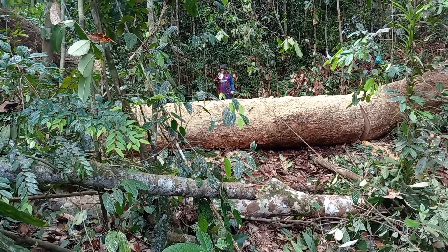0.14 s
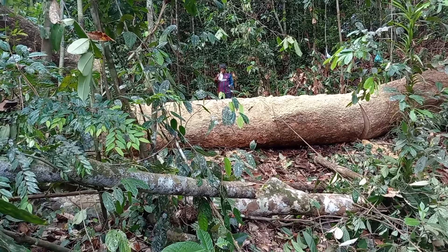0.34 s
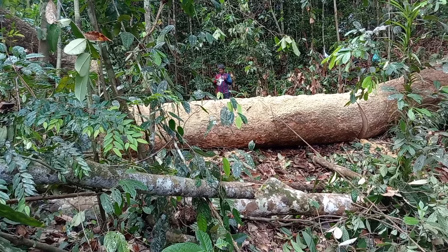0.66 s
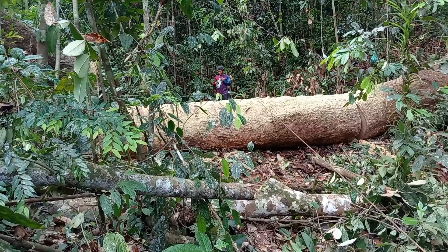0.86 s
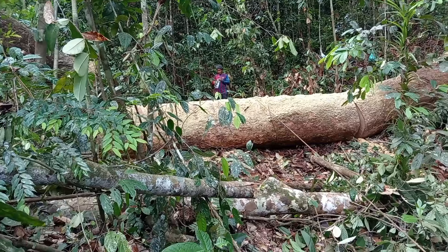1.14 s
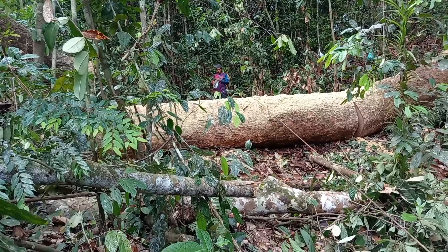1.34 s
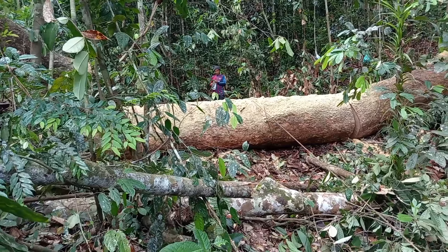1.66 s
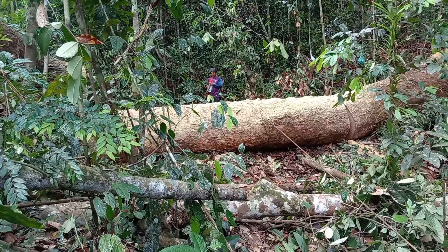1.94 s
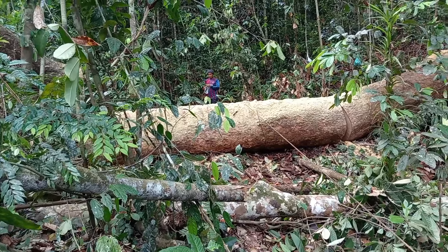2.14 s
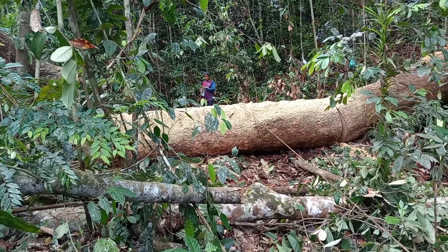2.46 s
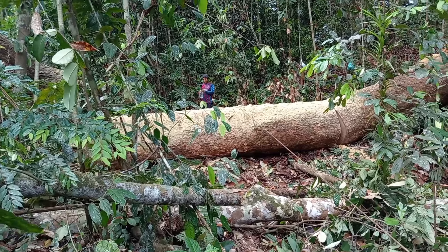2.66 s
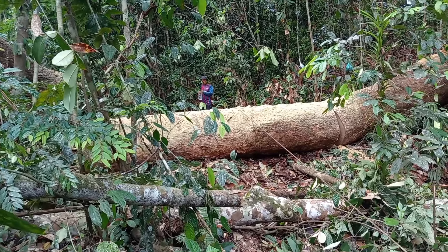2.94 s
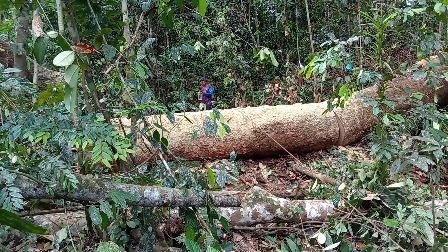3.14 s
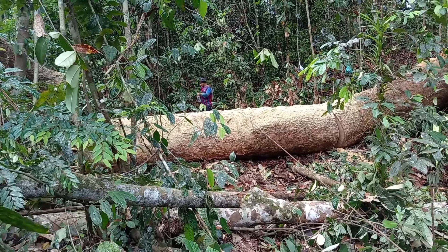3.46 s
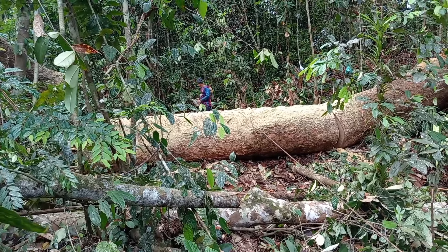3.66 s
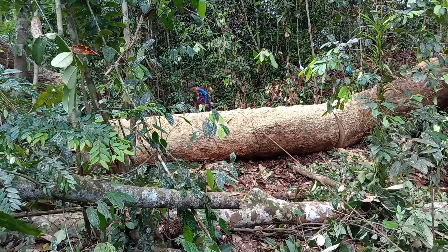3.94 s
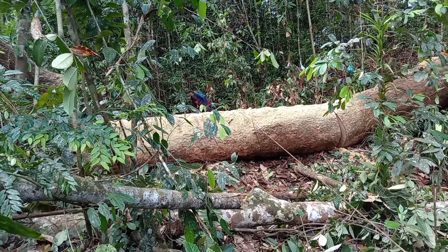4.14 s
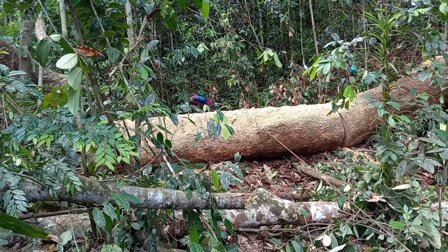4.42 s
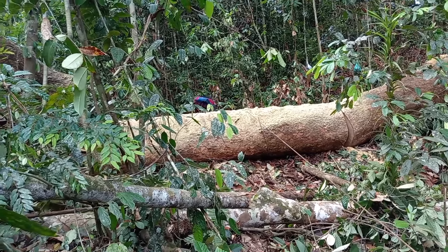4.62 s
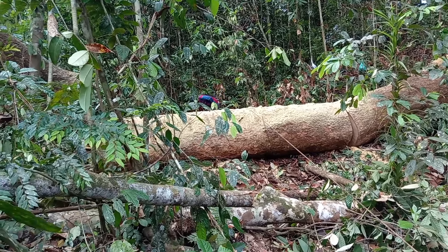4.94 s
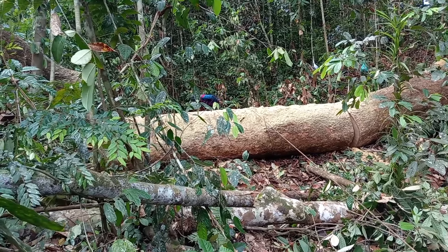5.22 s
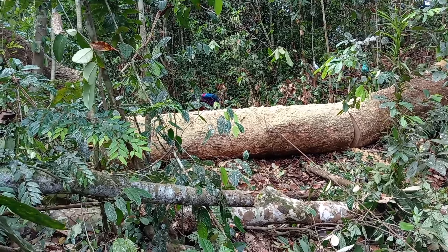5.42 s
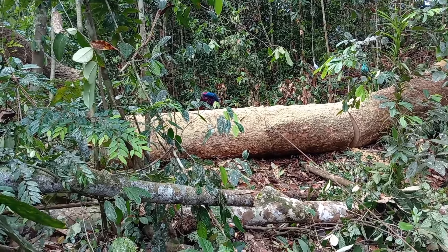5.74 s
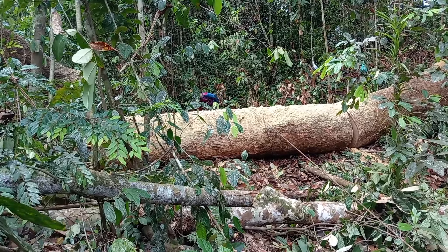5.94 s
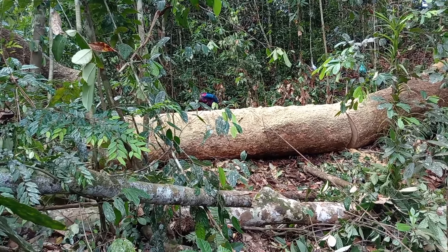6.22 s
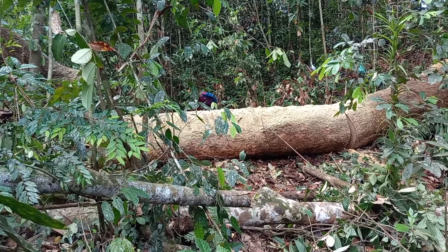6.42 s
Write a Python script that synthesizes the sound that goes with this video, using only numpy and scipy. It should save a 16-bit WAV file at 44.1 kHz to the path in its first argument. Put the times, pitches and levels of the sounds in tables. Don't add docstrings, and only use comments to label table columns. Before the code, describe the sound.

A hand winch ratchets in the forest, its hard metallic clicks echoing off trunks, with dull thuds and two hollow pole knocks midway.

```python
import sys
import numpy as np
from scipy import signal
from scipy.fft import rfft, irfft, next_fast_len
from scipy.io import wavfile
from scipy.ndimage import uniform_filter1d

SR = 44100
rng = np.random.default_rng(int(sys.argv[2]) if len(sys.argv) > 2 else 0)


def ratio(d):
    e = np.asarray(d, float) / 20
    return 10 ** e


def digitize_waveform(pressure):
    field = np.atleast_2d(pressure).T
    bounded = np.clip(field, -1, 1)
    quanta = np.round(bounded * 32767).astype(np.int16)
    wavfile.write(sys.argv[1], SR, quanta)


N = 290351

# f/Hz, level/dB, time to fade by 60 dB/s
POLE_TONES = [(197, -7, .1), (388, -10, .08), (505, -22, .08), (625, -1, .2), (660, -3, .16),
              (733, -3, .18), (960, -18, .05), (1190, -13, .04)]
# f/Hz, level/dB
CRACK_NOISE = [(2800, -2), (4200, -3), (6000, -1.5), (7500, -16.5), (9000, -11)]


def pawls():
    rows, parts = contacts()
    s, db, bright_db, centre, t60, tooth = np.transpose(rows)[:, :, None]
    lead = .008
    t = np.arange(SR // 9) / SR
    after = np.maximum(t - lead, 0)
    shape = len(s), len(t)
    rise = landing(db, bright_db, t - lead)

    def fall(share):
        return ratio(-60 * after / np.clip(share * t60, .004, 1))

    def colour(hz):
        return np.vstack([np.tile(np.interp(hz, f, gain), (count, 1)) for f, gain, count in parts])

    def on_time(x):
        return placed(x, s[:, 0] - lead - .0008)

    def dull(x):
        return filtered(x, lambda hz: 1 / (1 + (hz / 8300) ** 36 + (240 / (hz + 1)) ** 4))

    body, edge, jolt, glint, top = steel_parts(t, after, fall, shape, centre, tooth)
    attack = rise * (after < .01) * (after > 0)
    load_db = np.clip(-30.0 - 0.73 * bright_db, -40, -17)
    top_db = np.clip(8.16 * bright_db - 47.5, -47, -20)
    blow = even(body, attack) + ratio(bright_db) * even(edge, attack) + ratio(load_db) * jolt
    steel = dull(on_time(filtered(rise * blow, colour)))
    glints = dull(on_time(filtered(rise * ratio(bright_db - 18) * glint, colour)))
    spring = on_time(rise * ratio(top_db) * top)
    hum = placed(pole_hum(t, shape, db, bright_db), s[:, 0])
    return steel + spring, glints + np.roll(spring, 130), hum


def landing(db, bright_db, since):
    shape = len(db), len(since)
    after = np.maximum(since, 0)
    chatter_db = 4.37 * lumps(shape, 484)
    chatter_db = chatter_db - chatter_db[:, SR // 125:SR // 70].mean(1, keepdims=True)
    soft = np.clip(3.45 - 0.09 * bright_db - .04 * (db + 20), .6, 3)
    seated = 1 - np.exp(-after / 0.00072 / soft)
    slide = ratio(-24) * np.exp(np.minimum(since, 0) / 0.0011)
    again = .005 * (0.93 + .6 * rng.random(db.shape))
    bounce = 1 + ratio(-4) * (after > again) * np.exp(-np.abs(after - again) / 0.001)
    return ratio(db + 2.5) * (seated + slide) * bounce * ratio(chatter_db)


def steel_parts(t, after, fall, shape, centre, tooth):
    # f/Hz, level/dB, time to fade by 60 dB/s
    wheel = [(1180, -6, .04), (1380, -3, .04), (1520, -2, .04), (1690, -1, .04), (1850, -1, .04),
             (2050, 0, .045), (2290, 0, .04), (2480, -1, .04), (2750, -2, .035), (3080, -3, .04)]
    teeth = [(3600, -4, .02), (3890, -2, .028), (4400, -4, .02), (4800, -2, .022), (5200, -4, .02),
             (5600, -4, .022), (6680, -7, .025), (7400, -9, .035)]
    coil = [(9200, -1, .08), (10400, -5, .07), (12050, -4, .05), (13340, -8, .05), (14400, -3, .045),
            (15000, -5, .05), (15700, -4, .04)]
    # f/Hz, level/dB
    spring_noise = [(8500, 5.5), (10000, -3), (11000, -18), (12000, -12), (13300, -19), (15200, -10),
                    (16100, -19), (16700, -45.5)]
    cable_noise = [(220, 8.5), (390, 9), (650, -15), (1100, 3.5)]
    count = shape[0]

    def near_centre(hz):
        return (hz > 900) / (1 + (np.log2((hz + 1) / centre) / .45) ** 2)

    grit = unit(filtered(rng.standard_normal(shape), near_centre))
    body = ratio(1.5) * fall(1.0) * ring(wheel, t, count, 6, centre)
    body = body + (ratio(-5.0) * fall(0.42) + ratio(-14.5) * fall(1.84)) * grit
    edge = ratio(13.5) * fall(0.64) * ring(teeth, t, count, 6, tooth=tooth)
    edge = edge + ratio(-2.5) * fall(0.39) * noise(shape, CRACK_NOISE)
    jolt = fall(1.81) * (1 - np.exp(-after / 0.011)) * noise(shape, cable_noise)
    glint = fall(1.0) * noise(shape, CRACK_NOISE)
    top = fall(0.4) * noise(shape, spring_noise) + ratio(-18.5) * ring(coil, t, count, 10)
    return body, edge, jolt, glint, top


def pole_hum(t, shape, db, bright_db):
    swell = ratio(db - 22 - 0.41 * bright_db) * (1 - np.exp(-t / 0.28))
    return swell * ratio(5.8 * lumps(shape, 60)) * ring(POLE_TONES[3:6], t, shape[0], 2.7)


def contacts():
    # t/s, peak/dB, centre/Hz, time to fade by 60 dB/s
    take_up = [(0.3442, -17.5, 2010, 0.036), (1.0336, -8.5, 1910, 0.044), (1.6499, -14, 2060, 0.024),
               (2.331, -11.5, 2010, 0.035), (3.018, -12.5, 2250, 0.051), (3.6494, -17, 2180, 0.05),
               (4.158, -10.5, 1830, 0.03), (4.299, -13, 1920, 0.012), (4.9448, -13, 1930, 0.014),
               (5.6021, -22, 1750, 0.021), (6.239, -7, 2150, 0.012)]
    # t/s, peak/dB, centre/Hz, tooth/Hz, brightness/dB
    pull = [(0.4293, -10.5, 2400, 5470, 2), (0.4729, -12.5, 2230, 3780, 2.5),
            (0.5214, -13.5, 2260, 5120, 4.5), (0.611, -19, 2220, 6790, 2), (1.1, -14, 2200, 5400, 2),
            (1.142, -12, 2250, 3760, 1.5), (1.1914, -12.5, 2100, 4740, 3), (1.7421, -10, 2290, 4060, 1.5),
            (1.7887, -10, 2400, 4060, 2.5), (1.8359, -10.5, 2520, 3890, 1.5), (1.8952, -15, 2340, 5170, 2),
            (2.4164, -12, 2330, 3930, 2), (2.4674, -12.5, 2240, 3930, 2), (2.5481, -21, 2020, 4100, 5),
            (3.0864, -17.5, 2570, 4040, 1), (3.137, -10.5, 2520, 3750, 2), (3.2154, -25.5, 1760, 5150, 1.5),
            (3.7314, -11, 2380, 4060, 2.5), (3.7831, -13.5, 2600, 3800, 1.5), (3.8543, -17, 2240, 4840, 3),
            (4.388, -13.5, 2185, 5460, 2.5), (4.444, -15, 2090, 3730, 2), (4.5114, -17.5, 2520, 3930, 3.5),
            (5.0464, -13.5, 2450, 4470, 2), (5.1034, -15.5, 2580, 3930, 2), (5.1733, -18.5, 2100, 3900, 2),
            (5.68, -14.5, 2330, 3760, 1.5), (5.7329, -14, 2510, 3850, 1), (5.8159, -17, 2020, 6600, 2.5),
            (6.3154, -11.5, 2380, 6750, 2), (6.3662, -11, 2260, 3860, 2.5), (6.426, -14.5, 2180, 6650, 3.5)]
    # t/s, peak/dB, centre/Hz
    seat = [(0.0519, -18.5, 2160), (0.6939, -19.5, 1940), (1.3475, -18, 1700), (2.0403, -22.5, 1900),
            (2.6585, -19.5, 2040), (3.3295, -22.5, 2100), (3.995, -18.5, 2150), (4.66, -19, 1970),
            (5.2971, -19.5, 2100), (5.9279, -18.5, 2000)]
    # t/s, peak/dB
    ticks = [(0.326, -27), (0.939, -34), (0.9806, -29), (1.325, -45), (1.6262, -26), (2.0047, -37),
             (2.2935, -31), (2.6364, -37.5), (2.8833, -41.5), (2.938, -36.5), (3.2435, -27.5),
             (3.302, -31.5), (3.32, -32), (3.5932, -33), (3.955, -48), (4.2548, -27.5), (4.6241, -40),
             (4.8863, -32), (5.26, -34.5), (5.5473, -31.5), (5.583, -30), (5.8962, -42), (6.1756, -30),
             (6.508, -45.5), (6.568, -39)]
    # t/s, peak/dB, brightness/dB, centre/Hz
    rebounds = [(0.3588, -25, -26, 1750), (0.372, -18.5, 0.5, 2200), (0.7941, -20, -3, 1770),
                (1.052, -19, 1, 1670), (1.363, -14.5, -1.5, 2000), (1.6641, -19.5, -4, 1440),
                (1.6749, -18.5, 1, 2250), (1.693, -57, 28, 2220), (1.846, -30, -15, 1640),
                (2.0176, -25, -14, 1880), (2.026, -43, 10, 1650), (2.0577, -29.5, 1, 1890),
                (2.3466, -17.5, -19, 1760), (2.3533, -20, 1, 2030), (3.008, -18, -17, 1420),
                (3.0441, -25, -13, 1420), (3.6605, -15.5, -6, 1760), (3.671, -45, 24.5, 2080),
                (3.684, -28, -11, 1530), (4.1722, -21.5, 2.5, 2150), (4.31, -16, -6.5, 1410),
                (4.3212, -18.5, -1.5, 1910), (4.9562, -14.5, -10.5, 1720), (4.9772, -32, -6, 1400),
                (4.989, -27.5, -5, 1950), (5.3352, -27, -7, 1720), (5.3548, -27.5, 0, 1710),
                (5.6068, -19, 0.5, 1720), (5.6283, -30.5, -31, 1630), (6.254, -42.5, 23.5, 1440)]
    # t/s, peak/dB, centre/Hz
    slack = [(0.0228, -30.5, 1540), (0.412, -22, 1320), (0.5866, -30, 1440), (0.6658, -30.5, 1400),
             (0.675, -27.5, 1400), (1.0427, -17.5, 2030), (1.0686, -35.5, 1520), (1.094, -26.5, 1650),
             (1.095, -38, 1900), (1.241, -42.5, 1620), (1.3346, -29, 2230), (1.996, -44, 2300),
             (2.4052, -33, 1510), (2.605, -28.5, 2170), (2.624, -35, 1570), (3.052, -26.5, 2220),
             (3.2867, -44, 2300), (3.458, -30, 1800), (3.465, -18.5, 2050), (3.722, -24, 1480),
             (3.978, -33, 1460), (3.9922, -34, 1770), (4.3293, -24, 1680), (4.631, -39.5, 1900),
             (4.649, -42, 1700), (4.6409, -28.5, 1490), (4.8251, -35, 1700), (4.9972, -32.5, 1680),
             (5.005, -25.5, 1460), (5.028, -50, 1500), (5.039, -36, 1600), (5.282, -22, 1630),
             (5.565, -51, 1900), (5.577, -34, 2100), (5.596, -39, 2000), (5.909, -34, 1740),
             (5.92, -26.5, 1770), (6.161, -43, 1900), (6.2586, -19, 1430), (6.3034, -34, 1720)]
    # f/Hz, width/Hz,
    # level/dB
    hollows = [(2808, 240, -2), (4455, 91, -6.5), (5176, 100, 0.5), (7330, 160, -2.5)]
    lever = [(1020, 220, 4), (2150, 73, -6.5), (3060, 67, -2), (3880, 290, 5.5), (7300, 170, -15.5)]
    holder = [(1400, 206, 4), (2390, 600, -2.5), (3860, 260, 3), (6200, 410, 0), (7650, 480, -1),
              (8860, 1160, 7.5)]
    stop = [(2050, 105, 5.5), (2820, 120, 7), (3340, 170, 11), (4600, 110, 10), (5770, 220, 6.5),
            (7400, 92, -13)]
    driver = [(1400, 820, 2), (2500, 450, -2.5), (3670, 220, -7), (3720, 350, 7.5), (4620, 86, 6.5),
              (5710, 83, 7.5), (7600, 510, -2), (8210, 200, 6)]
    slow_ticks = [(s, db, -3, 1950, .026) for s, db in ticks]
    kinds = [(lever, [(s, db, -8.5, hz, t60) for s, db, hz, t60 in take_up]),
             (holder, [(s + .001, db - 4.0, bright_db, hz, .024, tooth_hz)
                       for s, db, hz, tooth_hz, bright_db in pull]),
             (stop, [(s, db, 1.5, hz, .025) for s, db, hz in seat]),
             (driver, slow_ticks + skips()),
             (lever, [(s, db, bright_db, hz, .03) for s, db, bright_db, hz in rebounds]),
             ([], [(s, db, -15.5, hz, .04) for s, db, hz in slack])]
    hz = np.arange(0, SR / 2, 20)

    def tint(part):
        return ratio(sum(db * np.exp(-((hz - c) / w) ** 2 / 2) for c, w, db in part + hollows))

    rows = [(*row, 100)[:6] for _, group in kinds for row in group]
    return rows, [(hz, tint(part), len(group)) for part, group in kinds]


def skips():
    # first tooth/s, last tooth/s, number of teeth, peak/dB, slowing/share
    swings = [(0.1104, 0.278, 5, -32, 0.027), (0.755, 0.902, 5, -32.5, -.09), (1.415, 1.577, 5, -32, 0.043),
              (2.0948, 2.213, 4, -31, 0.052), (2.7182, 2.836, 4, -30.5, -0.027),
              (3.3822, 3.5065, 4, -30.5, 0.049), (4.049, 4.123, 3, -30, 0.048),
              (4.705, 4.804, 4, -30, -0.0077), (5.347, 5.472, 4, -30, -0.041),
              (5.9774, 6.0825, 4, -30.5, 0.016)]
    rows = []
    for first, last, teeth, db, slowing in swings:
        u = np.linspace(-1, 1, round(teeth) - 1)
        way = np.cumsum(np.r_[0, 1 + slowing * u + 0.082 * u ** 2])
        rows += [(first + (last - first) * w / way[-1], db) for w in way]
    chance = 2 * rng.random((len(rows), 3)) - 1
    return [(s, db - a, 8.5 + 1.5 * b, 2233 * (1 + c / 8), .041)
            for (s, db), (a, b, c) in zip(rows, chance)]


def frame():
    # t/s, peak/dB
    thuds = [(0.063, -54), (0.367, -55), (0.435, -52.5), (0.603, -53), (0.691, -51.5), (0.798, -60),
             (1.047, -56), (1.364, -48.5), (1.666, -52), (2.041, -50), (2.342, -50), (2.662, -50.5),
             (3.024, -52), (3.325, -49.5), (3.658, -54), (3.995, -49), (4.376, -50), (4.657, -52),
             (4.821, -59.5), (4.956, -51.5), (5.297, -53), (5.632, -51), (5.928, -53), (6.254, -56.5)]
    # f/Hz, level/dB, time to fade by 60 dB/s
    frame_tones = [(115, -9.5, 0.1), (144, -7, 0.091), (176.7, -7.5, 0.07)]
    s, db = np.transpose(thuds)[:, :, None]
    t = np.arange(SR // 3) / SR
    shaking = ratio(3 * lumps((len(s), len(t)), 40))
    swell = (t / 0.0099) ** 2 / (1 + (t / 0.0066) ** 2) * ratio(db + 19.0) * shaking
    return placed(swell * ring(frame_tones, t, len(s), 1.6), s[:, 0] - .004)


def pole():
    # t/s, level/dB
    knocks = [
        (3.455, -59.5),
        (3.4729, -43.5),
        (4.1735, -33.5),
    ]
    s, db = np.transpose(knocks)[:, :, None]
    hz, level_db, t60 = np.transpose(POLE_TONES)[:, :, None]
    t = np.arange(SR // 3) / SR
    sign = np.where(hz > 700, -1, 1)
    tone = (sign * ratio(level_db - 60 * t / t60) * np.sin(2 * np.pi * hz * t)).sum(0)
    damping = ratio(-13 / (1 + np.exp((.024 - t) / 0.0018)))
    return placed(ratio(db + 13) * (1 - np.exp(-t / 0.0025)) * damping * tone, s[:, 0])


def trunks(x):
    # f/Hz, time/s
    echo_fade = [(150, 0.52), (650, 0.11), (2000, 0.078), (6000, 0.19), (9000, 0.12), (14000, 0.18)]
    hop = SR // 4
    out = np.zeros((2, N + 3 * SR))
    x = np.pad(x, (hop, 2 * hop))
    fade = np.sin(np.pi * np.arange(2 * hop) / (2 * hop))
    for start in range(0, N + hop, hop):
        hz, t, z = signal.stft(rng.standard_normal((2, SR // 3)), SR, nperseg=128)
        z = z * ratio(-60 * t / np.abs(along(echo_fade, hz))[:, None])
        tail = signal.istft(z, SR, nperseg=128)[1]
        tail = tail / np.linalg.norm(tail[0])
        wet = signal.fftconvolve(fade * x[None, start:start + 2 * hop], tail, axes=1)
        out[:, start + 90:start + 90 + wet.shape[1]] += wet
    return out[:, hop:hop + N]


def canopy():
    # f/Hz, level/dB
    insect_noise = [(4900, -24), (5400, -12), (5650, -5), (5850, 0), (6100, -5), (6450, -11), (7400, -15),
                    (8150, -36)]
    air_noise = [(30, -4), (110, 0), (1100, -25.5), (2000, -5.5), (4500, -17.5), (7800, -39.5), (8800, -60),
                 (11500, -46.5), (16000, -46)]
    swell_db = 0.83 * lumps((1, N), 50) + 1.3 * lumps((1, N), 2.7)
    insects = ratio(-60 + swell_db) * noise((2, N), insect_noise)
    return insects * ratio([[-1.5], [1.5]]) + ratio(-65.5) * noise((2, N), air_noise) + cricket()


def cricket():
    # start t/s, end t/s, level/dB
    songs = [
        (.5, 1.0, -98),
        (2.8, 3.1, -101),
        (3.3, 4.55, -99),
        (5.0, 5.25, -101),
        (6.1, 6.6, -97),
    ]
    t = np.arange(N) / SR
    bouts = uniform_filter1d(sum(ratio(db) * ((t > a) & (t < b)) for a, b, db in songs), size=2000)
    phase = 2 * np.pi * 11480 * t + 1.5 * lumps((1, N), 30)
    return bouts * ratio(8 * lumps((1, N), 18)) * np.sin(phase)


def ports(x, lag):
    # f/Hz, level/dB
    shade = [(100, 2), (1300, -1.5), (4400, -5), (8000, -4.5), (15000, -13)]

    def half(hz):
        return ratio(along(shade, hz) / 2) * np.exp(-1j * np.pi * hz * lag / SR)

    return filtered(x, lambda hz: np.array([half(hz), 1 / half(hz)]))


def ring(modes, t, count, scatter_db, centre=None, tooth=None):
    hz, db, t60 = np.transpose(modes)[:, :, None]
    shapes = ratio(-60 * t / np.abs(t60)) * np.exp(2j * np.pi * hz * t)
    chance = rng.random((count, len(modes), 2))
    weights = ratio(db.T + scatter_db * (2 * chance[..., 0] - 1))
    if centre is not None:
        weights = weights / (1 + (np.log2(hz.T / centre) / .3) ** 2)
    if tooth is not None:
        weights = weights * ratio(10.5 / (1 + (np.log2(hz.T / tooth) / .08) ** 2))
    weights = weights / np.linalg.norm(weights, axis=1, keepdims=True)
    return (weights * np.exp(2j * np.pi * chance[..., 1]) @ shapes).imag


def even(rows, weight):
    force = np.linalg.norm(rows * weight, axis=1, keepdims=True)
    force = force / np.linalg.norm(weight, axis=1, keepdims=True)
    return rows * np.median(force) / force


def placed(rows, times):
    size = rows.shape[1]
    out = np.zeros(N + 2 * size)
    for row, s in zip(rows, times):
        out[size + round(s * SR):][:size] += row
    return out[size:size + N]


def lumps(shape, rate):
    knots = rng.standard_normal((shape[0], int(shape[1] * rate / SR) + 4))
    at = np.arange(shape[1]) * rate / SR
    k = at.astype(int)
    return knots[:, k] * (1 - at + k) + knots[:, k + 1] * (at - k)


def noise(shape, spectrum):
    return unit(filtered(rng.standard_normal(shape), lambda hz: ratio(along(spectrum, hz, -99.0))))


def unit(x):
    return x / np.sqrt(np.mean(x ** 2, -1, keepdims=True) + 1e-20)


def along(points, hz, ends=None):
    f, v = np.transpose(points)
    return np.interp(np.log(hz + 1), np.log(f + 1), v, ends, ends)


def filtered(x, response):
    n = x.shape[-1]
    m = next_fast_len(n + min(4096, n // 4))
    return irfft(rfft(x, m) * response(np.fft.rfftfreq(m, 1 / SR)), m)[..., :n]


def scene():
    clicks, glints, hum = pawls()
    thuds = frame()
    knocks = pole() + hum
    wet = trunks(ratio(-8.0) * clicks + ratio(-1.0) * thuds + ratio(-5.5) * knocks)
    wet = filtered(wet, lambda hz: 1 / (1 + (hz / 9000) ** 6))
    forest = wet * ratio([[-1.5], [1.5]]) + canopy()
    forest -= filtered(forest - forest.mean(0), lambda hz: 1 / (1 + (hz / 450) ** 2))
    winch = ports(clicks, 18.5) + ports(glints, 18.5) * [[1], [-1]]
    return winch + ports(thuds, 23.0) + ports(knocks, .3) + forest


def band_limit(x):
    return signal.sosfilt(signal.butter(12, 16790, fs=SR, output="sos"), x)


def record(dry):
    mix = filtered(dry, lambda hz: 1 / (1 + (58 / (hz + 1)) ** 4) ** .5)
    return band_limit(mix)


dry = scene()
out = record(dry)
digitize_waveform(out)
```